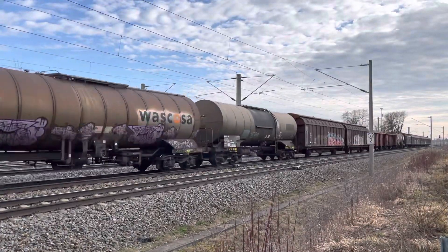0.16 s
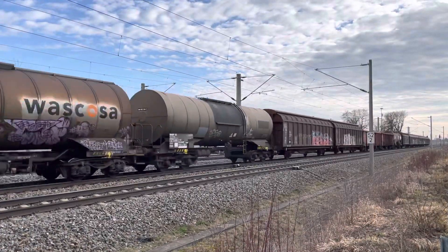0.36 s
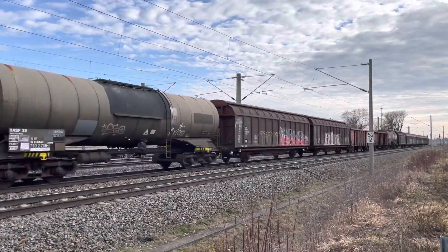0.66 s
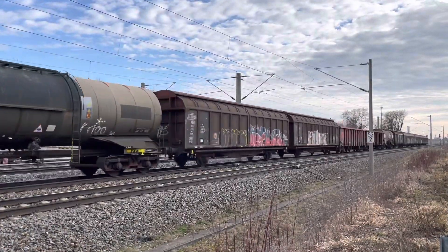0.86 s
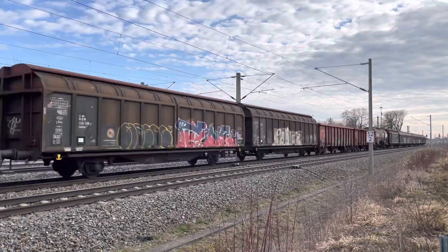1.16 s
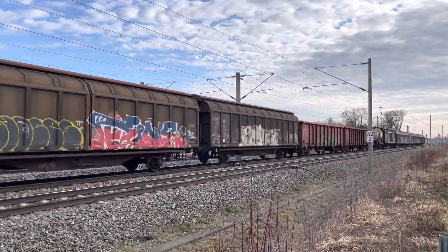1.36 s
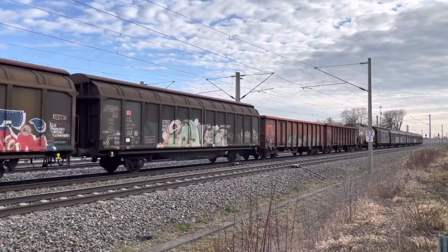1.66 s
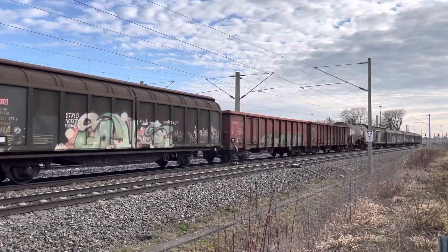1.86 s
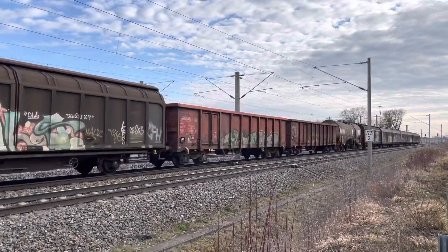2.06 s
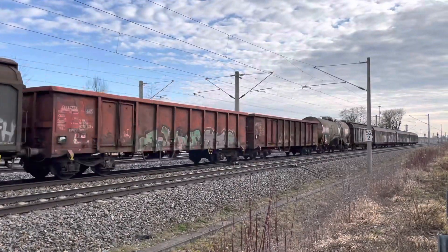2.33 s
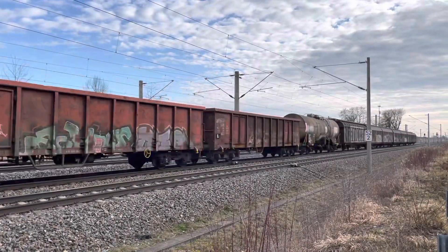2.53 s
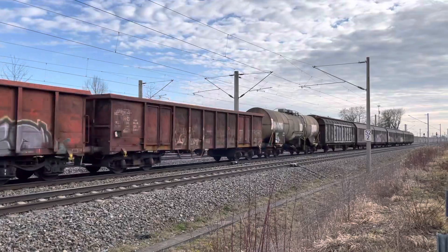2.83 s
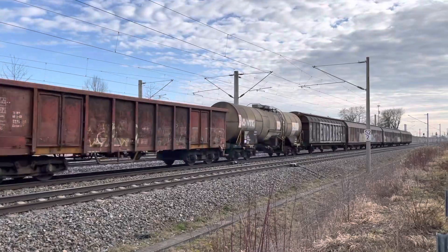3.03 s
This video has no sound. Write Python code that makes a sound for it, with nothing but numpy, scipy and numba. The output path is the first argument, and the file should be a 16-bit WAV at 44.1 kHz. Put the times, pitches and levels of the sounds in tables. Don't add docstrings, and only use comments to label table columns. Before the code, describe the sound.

A long freight train passes trackside with rumbling roar, ringing wheels, clanks and slight flange squeal

```python
import sys
import numpy as np
from scipy import signal
from scipy.fft import rfft, irfft, next_fast_len
from scipy.io import wavfile
from scipy.ndimage import uniform_filter1d
from numba import njit

SR = 44100
rng = np.random.default_rng(int(sys.argv[2]) if len(sys.argv) > 2 else 0)


def magnitude_from_level(level_db):
    exponent = np.asarray(level_db, float) / 20
    return 10 ** exponent


def wav_out(sig):
    wavfile.write(sys.argv[1], SR, np.round(np.clip(np.atleast_2d(sig).T, -1, 1) * 32767).astype(np.int16))


N = 140679
T = np.arange(N) / SR

# t/s, level/dB
BOOM_LEVEL = [(0.0, -31), (0.16, -30.5), (0.34, -36), (0.35, -29.5), (1.41, -28.5), (2.34, -30.5),
              (2.68, -24), (2.7, -29), (3.19, -26)]
# f/Hz, level/dB
BOOM_COLOUR = [(25, -32), (40, 2), (70, 8), (105, 8), (150, -10), (220, -29)]
# t/s, level/dB
HISS_LEVEL = [(0, -35.5), (.5, -39), (.65, -34), (1.2, -35.5), (1.8, -35.5), (2.2, -35.5), (2.7, -35),
              (2.9, -33.5), (3.19, -31.5)]
# f/Hz, level/dB
HISS_COLOUR = [(2000, -2), (3000, 4), (4000, 0.5), (5200, -2.5), (6500, -8.5), (8000, -30), (10000, -36)]
# f/Hz, level/dB
FIZZ_COLOUR = [(6500, 7), (8500, 2.5), (10500, 5), (13000, -2.5), (15200, -6)]
# t/s, level/dB
RAIL_LEVEL = [(0.0, -44), (0.4, -47), (0.75, -25.5), (1.18, -32.5), (1.21, -22), (1.4, -34), (2.38, -26.5),
              (2.47, -45), (2.5, -25), (2.69, -33.5), (3.15, -28), (3.19, -61)]
# middle t/s, half length/s, f/Hz, level/dB
SINGING_MODES = [(.2, .22, 4060, -44), (.55, .15, 4030, -43), (.6, .35, 4700, -47), (.75, .25, 3370, -43),
                 (.5, .25, 2480, -38), (.75, .1, 2370, -36), (.2, .2, 2130, -38), (.91, .06, 3854, -42),
                 (.93, .08, 2583, -36), (1.0, .07, 1507, -31), (1.01, .07, 2196, -36),
                 (1.09, .05, 2562, -38), (1.23, .06, 2583, -35), (1.29, .13, 667, -32),
                 (1.31, .06, 2605, -37), (1.21, .04, 1098, -27), (1.36, .08, 1520, -27),
                 (1.43, .06, 4112, -43), (1.51, .06, 3596, -42), (1.52, .07, 2174, -32),
                 (1.69, .07, 3660, -42), (1.71, .08, 2368, -34), (1.81, .07, 3531, -39),
                 (1.83, .06, 2820, -37), (1.86, .08, 4306, -42), (1.92, .09, 1550, -29),
                 (1.96, .06, 3402, -40), (1.99, .07, 2325, -34), (2.05, .06, 4026, -44),
                 (2.07, .07, 3359, -38), (2.13, .15, 2170, -33), (2.29, .08, 3509, -41),
                 (2.39, .07, 1399, -29), (2.41, .05, 4220, -42), (2.45, .09, 4521, -42),
                 (2.53, .08, 3639, -41), (2.53, .06, 5534, -47), (2.6, .06, 4112, -45),
                 (2.62, .06, 1442, -27), (2.64, .07, 3466, -42), (2.71, .09, 5577, -45),
                 (2.76, .07, 5017, -45), (2.83, .06, 2670, -38), (2.94, .06, 3983, -44),
                 (2.93, .1, 1450, -30), (3.02, .05, 3509, -34), (3.05, .06, 4866, -43),
                 (3.11, .09, 1385, -27), (3.13, .07, 2777, -39), (3.13, .06, 861, -32)]
# t/s, f/Hz, ring time/s, peak level/dB
KNOCKS = [(.53, 1470, .14, -21), (.955, 1540, .06, -20), (1.051, 1550, .06, -12), (1.125, 1440, .07, -16),
          (1.149, 1580, .06, -16), (1.197, 1400, .11, -14), (1.246, 1540, .07, -16), (1.352, 700, .06, -17),
          (1.39, 1500, .07, -18), (1.466, 1540, .09, -16), (1.68, 1150, .09, -18), (1.764, 1520, .08, -9.5),
          (1.826, 2500, .04, -13), (1.836, 2030, .11, -12), (2.178, 1400, .16, -13),
          (2.184, 1490, .14, -15), (2.276, 1385, .18, -13.5), (2.772, 1450, .1, -18),
          (2.816, 1440, .12, -16), (1.452, 1500, .08, -17)]
# middle t/s, half length/s, f/Hz, width/Hz, level/dB
FLANGE_SCRAPES = [(1.62, 0.11, 7900, 14000, -36), (1.92, .1, 12500, 2700, -65),
                  (1.9, .03, 13000, 7600, -43), (2.723, 0.12, 5800, 1000, -32.5),
                  (3.06, 0.059, 4500, 2300, -30.5), (3.156, 0.14, 5950, 500, -38),
                  (2.5, 0.1, 13000, 3000, -47), (2.6, 0.041, 7700, 3400, -52), (2.78, 0.1, 4800, 500, -42),
                  (1.8, 0.2, 2300, 44, -34), (2.8, 0.88, 2180, 260, -30), (2.9, 0.2, 194, 44, -28)]
# t/s, gain over the roar/dB, brightness [0-1]
TREAD_THUMPS = [(.53, 3, 0.2), (1.05, 0, .3), (1.12, 2, 0.1), (1.193, 5.5, 0), (1.25, 1, 0.2),
                (1.30, 2, 0.2), (1.35, 1, 0), (1.39, 1.5, .3), (1.465, 0.5, 0.3), (1.665, 2, 0.8),
                (1.759, 4, 0), (1.82, 2, 0.9), (1.932, 2.5, 0.5), (2.045, 2.5, 0.2), (2.18, 3, 0.7),
                (2.28, 4.5, .6), (2.39, 4.5, 0.4), (2.493, 4.5, 1), (2.602, 5, 0.2), (2.709, 4.3, .6),
                (2.809, 3.5, 0), (2.905, 1.5, 0.8), (3.006, 4.5, 1), (3.117, 4.5, 0)]
# t/s, roar level/dB, wheel ring level/dB
PASSING = [(0, -28, -35), (.3, -28, -37), (.6, -28.5, -32), (.9, -27.5, -27.5), (1.15, -24, -29),
           (1.4, -24.5, -28.5), (1.6, -23, -23.5), (1.85, -22.5, -23.5), (2.1, -22.5, -25),
           (2.35, -25, -27.5), (2.6, -25, -29), (2.85, -25.5, -27.5), (3.19, -27, -47)]
# t/s, factor [1]
PITCH_DRIFT = [(0, 1), (.6, .99), (1.05, 1.015), (1.55, 1.02), (1.9, 1), (2.3, .975), (2.8, .975),
               (3.19, .945)]
# f/Hz, width/Hz, level/dB
DISC_MODES = [(1411, 27, 2.5), (1486, 31, 3), (1547, 23, -4)]
# f/Hz, width/Hz, level/dB
AXLE_MODES = [(188.2, 25.5, -7.5), (641, 94, -6), (730, 50, -38), (854, 68, -9), (1171, 36, -4.5),
              (1981, 45, -8), (2280, 53, -33), (2590, 51, -16.5), (3460, 42, -14.5), (3850, 20, -46),
              (4720, 33, -23)]
# f/Hz, density/dB per Hz
ROAR_COLOUR = [(100, -8), (180, -4.5), (420, -5), (800, 0.5), (1250, -4.5), (1800, -10), (2300, -9.5),
               (3200, -24.5)]
# f/Hz, phase/rad
PORT_LEAD = [(1120, 2.21), (1500, 4.67), (2070, 5.17), (3000, 8.2), (5200, 5.3), (6550, 4.47), (8200, 3.4),
             (12500, 0.55)]
# f/Hz, share [0-1]
PORT_COMMON = [(60, 1), (250, 0.85), (600, 0.82), (1200, 0.55), (2200, 0.85), (4500, 0.27), (8500, 0.97),
               (12000, 1)]
# f/Hz, level/dB
PORT_LEAN = [(40, -1.3), (250, -0.7), (600, 2), (1200, 3.5), (2000, -0.5), (4000, 1.5), (8000, 1)]


def curve(table, col):
    a = np.array(table)
    return np.interp(T, a[:, 0], a[:, col])


def on_log(table, hz):
    a = np.array(table)
    return np.interp(np.log(hz), np.log(a[:, 0]), a[:, 1])


def unit(x):
    return x / np.sqrt(np.mean(x ** 2))


def noise():
    return rng.standard_normal((3, N))


def walk(rate):
    hold = int(SR / rate)
    steps = np.repeat(rng.standard_normal(N // hold + 1), hold)
    slewed = uniform_filter1d(uniform_filter1d(steps, hold), hold)
    return unit(slewed[:N])


@njit
def svf(x, hz, width):
    y = np.empty(x.shape)
    for c in range(x.shape[0]):
        band, low = 0., 0.
        for i in range(x.shape[1]):
            g = np.tan(np.pi * hz[i] / 44100)
            k = width / hz[i]
            v = (band + g * (x[c, i] - low)) / (1 + g * (g + k))
            band = 2 * v - band
            low = low + 2 * g * v
            y[c, i] = k * v
    return y


def bands(colour, push_db, flicker_db, rate):
    size = next_fast_len(N)
    hz = np.fft.rfftfreq(size, 1 / SR) + 1e-3
    lo, hi = colour[0][0], colour[-1][0]
    spec = rfft(rng.standard_normal((3, size))) * magnitude_from_level(on_log(colour, hz)) * (hz > lo) * (hz < hi)
    out = 0
    for step in np.arange(0, 2 * np.log2(hi / lo) + 1):
        part = np.cos(np.pi / 2 * np.clip(2 * np.log2(hz / lo) - step, -1, 1)) ** 2
        out = out + irfft(spec * part, size)[:, :N] * magnitude_from_level(flicker_db * walk(rate))
    return unit(out) * magnitude_from_level(push_db)


def ring(modes, push_db, swell_db):
    force = noise() * magnitude_from_level(push_db)
    out = 0
    for hz, width, db in modes:
        centre = hz * curve(PITCH_DRIFT, 1) * (1 + .004 * walk(3.47))
        gain = magnitude_from_level(db + swell_db * walk(11.65)) / np.sqrt(width)
        out = out + gain * svf(force, centre, 1. * width)
    return out / np.sqrt(np.mean((out / magnitude_from_level(push_db)) ** 2))


def thumps():
    rise_s, fall_s = 0.0083, 0.033
    at, db, bright = np.array(TREAD_THUMPS).T[:, :, None]
    d = T - at - rise_s
    shape = np.where(d < 0, np.exp(-(d / rise_s) ** 2), np.exp(-(d / fall_s) ** 2))
    return (db * shape).sum(axis=0), (db * bright * shape).sum(axis=0)


def fizz(bright):
    return bands(FIZZ_COLOUR, -44.5 + 0.56 * bright, flicker_db=.8, rate=3.2)


def hiss(bright):
    return bands(HISS_COLOUR, curve(HISS_LEVEL, 1) - 0.2 + 1.3 * bright, flicker_db=2.5, rate=11.7)


def boom(full):
    return bands(BOOM_COLOUR, curve(BOOM_LEVEL, 1) - 0.5 + 0.29 * full, flicker_db=-1.9, rate=3.7)


def panels(push_db):
    count, low_hz, high_hz, width_hz = 16, 1900, 6400, 70.
    tilt_db, swell_db = -8, 3
    force, drift = noise(), curve(PITCH_DRIFT, 1)
    out = 0
    for place in (np.arange(count) + rng.random(count)) / count:
        hz = low_hz * (high_hz / low_hz) ** place
        db = tilt_db * np.log2(hz / low_hz) + swell_db * walk(4.3)
        mode = svf(svf(force, hz * drift, width_hz), hz * drift, 2 * width_hz)
        out = out + magnitude_from_level(db) * mode
    return unit(out) * magnitude_from_level(curve(HISS_LEVEL, 1) - 1.5 + push_db)


def rail(push_db):
    width_hz = 28.6
    centre = 275.8 * (1 + 0.028 * walk(1.97))
    hum = svf(svf(noise(), centre, width_hz), centre, 2 * width_hz)
    return unit(hum) * magnitude_from_level(curve(RAIL_LEVEL, 1) - 1 + push_db)


def sings():
    sink_per_s, waver_rad, flutter_db, scatter = .09, 1.6, 3, .6
    out = np.zeros((3, N))
    waver, flutter = np.array([walk(110) for _ in range(3)]), walk(45)
    for k, (at, length, hz, db) in enumerate(SINGING_MODES):
        on = np.abs(T - at) < length
        d = T[on] - at
        phase = 2 * np.pi * hz * (d - sink_per_s * d ** 2 / 2)
        phase = phase + waver_rad * np.roll(waver, k * 9001, axis=1)[:, on]
        gain = magnitude_from_level(db - 4 + flutter_db * np.roll(flutter, k * 7001)[on])
        env = np.cos(np.pi / 2 * d / length)
        out[:, on] += gain * env * np.sqrt(2) * np.sin(phase + np.arange(3)[:, None] * k)
    return out[0] + scatter * out[1:]


def pings():
    knock_s, rough = 0.0031, .12
    out = 0
    for at, hz, t60, db in KNOCKS:
        decay = (T > at) * np.exp(-np.maximum(T - at, 0) / knock_s)
        knock = rough * rng.standard_normal((2, N)) * decay
        knock[:, int(at * SR)] = 1
        tone = svf(knock, np.full(N, 1. * hz), np.log(1000) / np.pi / t60)
        out = out + magnitude_from_level(db) * tone / np.abs(tone).max(axis=1, keepdims=True)
    return out


def scrapes():
    out = 0
    for at, length, hz, width, db in FLANGE_SCRAPES:
        env = np.cos(np.pi / 2 * np.clip((T - at) / length, -1, 1)) ** 2
        centre = np.full(N, 1. * hz)
        rub = svf(svf(noise(), centre, 1. * width), centre, 1. * width)
        out = out + magnitude_from_level(db) * env * unit(rub)
    return out


def squeal():
    at_s, length_s = 3.0, .03
    d = (T - at_s) / length_s
    skirt = magnitude_from_level(-11 + 2.6 * walk(27.4)) * np.exp(-(d / 5.6) ** 2)
    tone = svf(noise(), np.full(N, 5378.), 30.)
    return magnitude_from_level(-30) * (np.exp(-d ** 2) + skirt) * unit(tone)


def wheels(full):
    disc = ring(DISC_MODES, 1.0 * full, swell_db=1.0) * magnitude_from_level(curve(PASSING, 2) + 1.4)
    axles = ring(AXLE_MODES, 0.96 * full, swell_db=2.45) * magnitude_from_level(curve(PASSING, 1) - 3)
    return disc + axles


def roar(full):
    return bands(ROAR_COLOUR, curve(PASSING, 1) + 3.5 + full, flicker_db=.7, rate=27.0)


def ports(rows):
    size = next_fast_len(N)
    hz = np.fft.rfftfreq(size, 1 / SR) + 1e-3
    spec = rfft(rows, size)
    lead = np.interp(hz, [0] + [f for f, _ in PORT_LEAD], [0] + [p for _, p in PORT_LEAD])
    common = np.clip(on_log(PORT_COMMON, hz), 0, 1)
    side = np.array([[1], [-1]])
    direct = np.sqrt(common) * spec[0] * np.exp(.5j * side * lead)
    both = direct + np.sqrt(1 - common) * spec[1:]
    return irfft(both * magnitude_from_level(side * on_log(PORT_LEAN, hz) / 2), size)[:, :N]


def scene():
    full, bright = thumps()
    background = fizz(bright) + hiss(bright) + boom(full) + panels(1.3 * full) + rail(full / 2)
    train = background + scrapes() + squeal() + wheels(full) + roar(full)
    return ports(train) + pings() + sings()


def low_pass(x):
    return signal.sosfilt(signal.butter(12, 15050, fs=SR, output="sos"), x)


def record(dry):
    rounded = np.tanh(.6 * dry) / .6
    top_cut = signal.cheby1(10, 1, 14350, fs=SR, output="sos")
    mix = signal.sosfilt(top_cut, rounded)
    return low_pass(mix)


dry = scene()
out = record(dry)
wav_out(out)
```